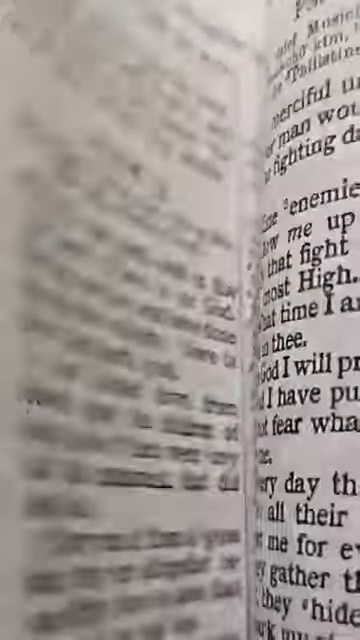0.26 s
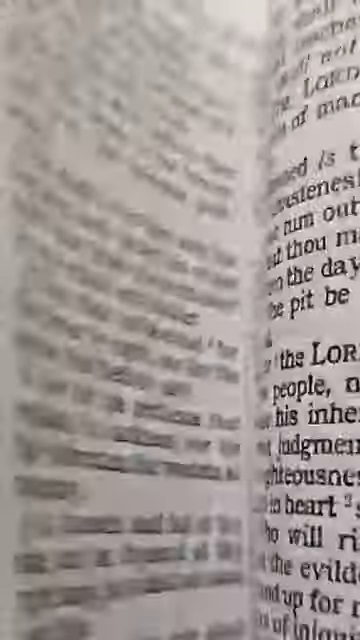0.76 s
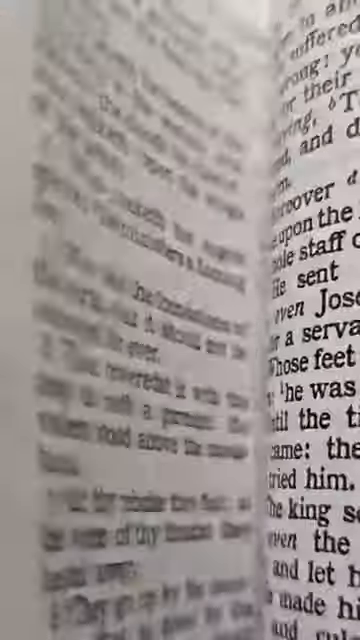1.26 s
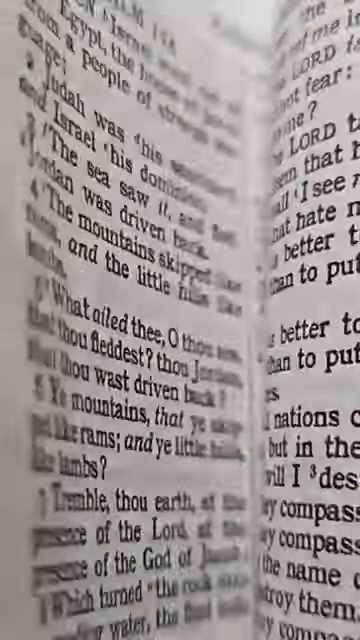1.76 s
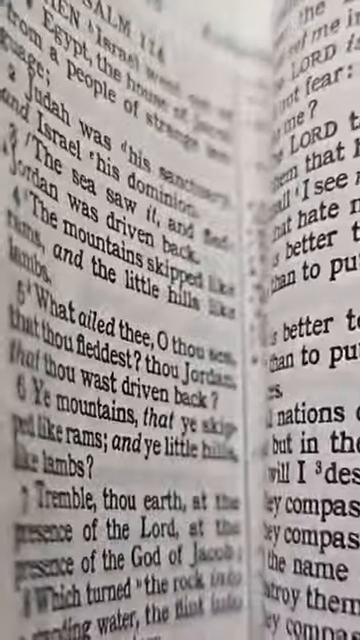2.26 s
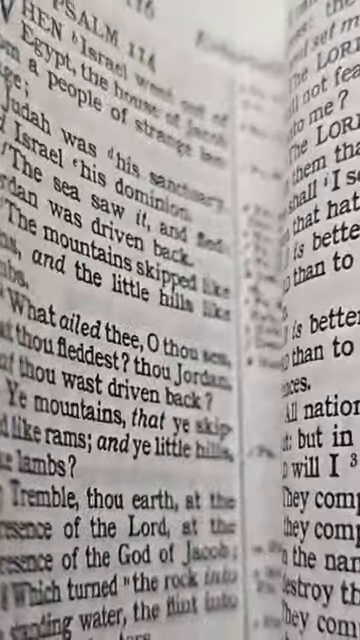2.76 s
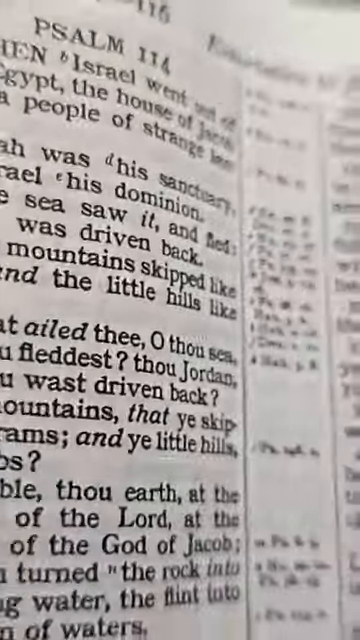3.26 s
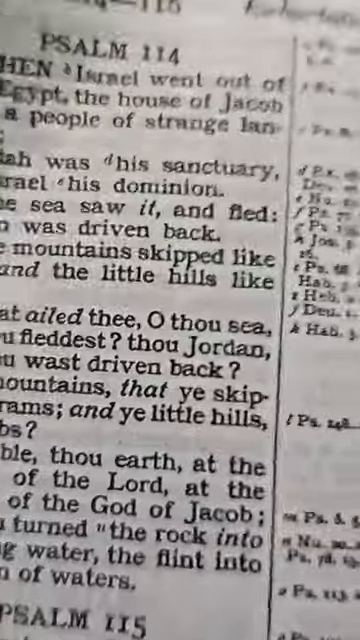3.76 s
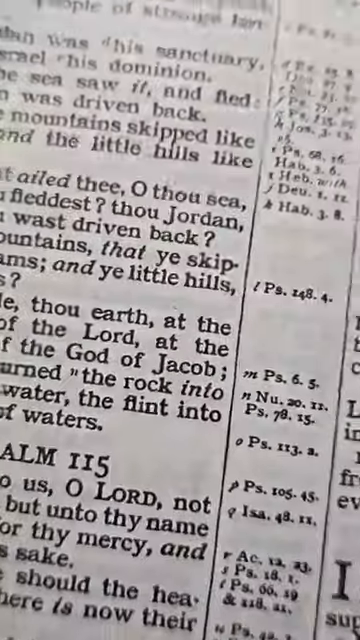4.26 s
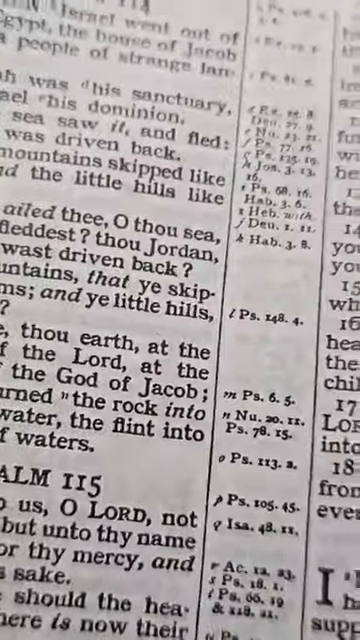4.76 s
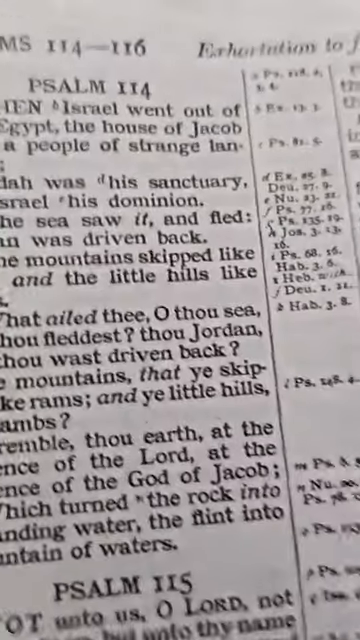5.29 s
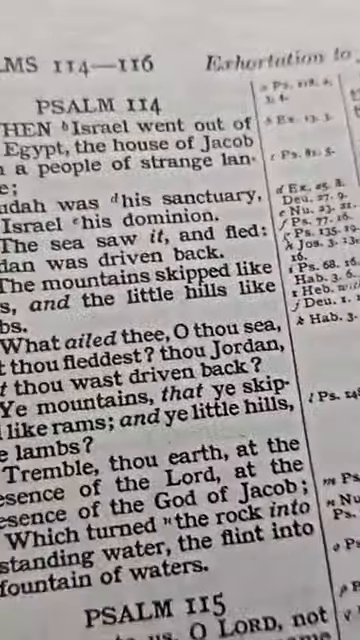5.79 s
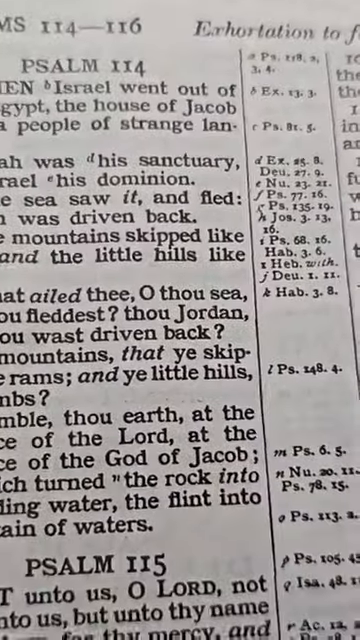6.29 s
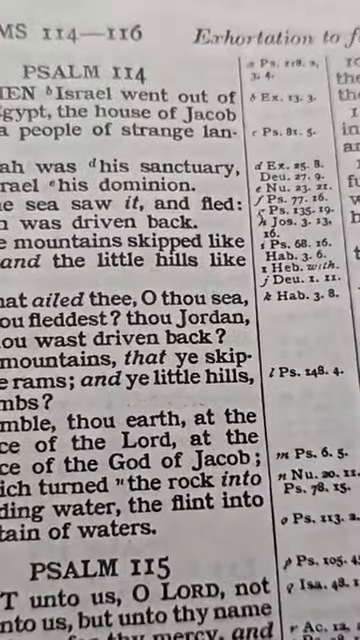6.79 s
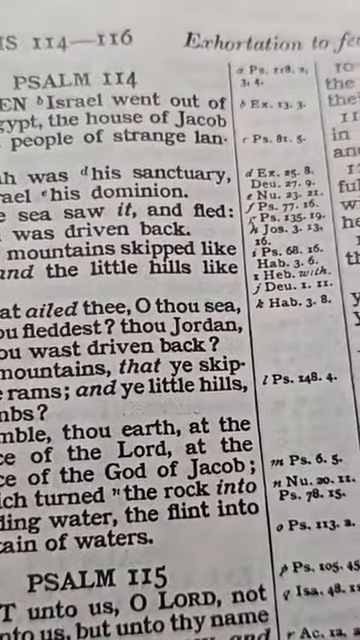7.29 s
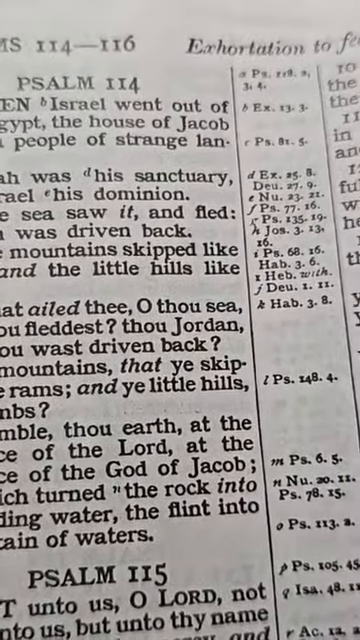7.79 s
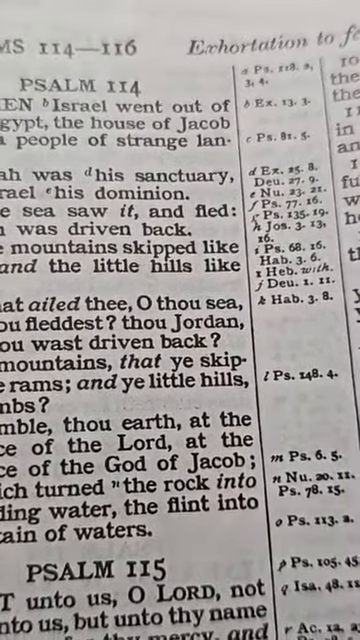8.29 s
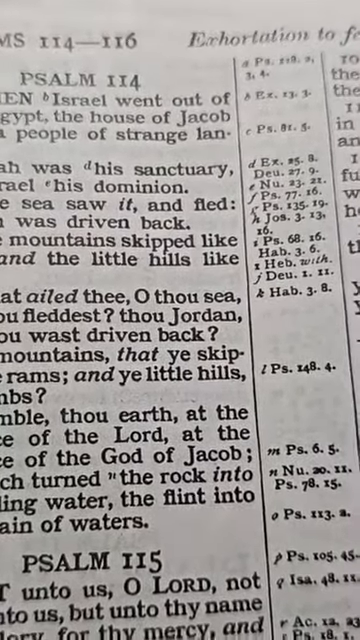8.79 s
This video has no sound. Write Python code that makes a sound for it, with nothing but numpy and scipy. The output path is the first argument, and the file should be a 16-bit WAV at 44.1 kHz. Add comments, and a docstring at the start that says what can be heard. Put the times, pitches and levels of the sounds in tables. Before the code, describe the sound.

Close papery rustles, hollow rubbing and bright crinkling snaps from a thick book's thin pages in a quiet room with faint motor hum.

```python
"""Thin pages of a thick book are leafed through by hand, close to the microphones, in a quiet room.
A few leaves whisper past, a hand sweeps the book flat, then a page is lifted and crackles as it buckles.
Paper is shaped noise: juddering hiss for slides, a hollow rasp for rubbing, short bursts for snaps and pats.
Behind it, two motors of nearly equal speed, built from sine waves, hum and beat slowly against each other.
A low ventilation rumble under faint hiss is steady coloured noise, and the book has a faint echo tail."""
import sys
import numpy as np
from scipy import signal
from scipy.fft import rfft, irfft, next_fast_len
from scipy.io import wavfile
from scipy.ndimage import uniform_filter1d

SR = 44100
rng = np.random.default_rng(int(sys.argv[2]) if len(sys.argv) > 2 else 0)


def log_audio(samples):
    """Write samples as a 16-bit WAV file to the path given in sys.argv[1]."""
    # one column per channel
    frames = np.atleast_2d(samples).T
    # limit to full scale, then quantise
    limited = np.clip(frames, -1, 1)
    pcm = np.round(limited * 32767).astype(np.int16)
    wavfile.write(sys.argv[1], SR, pcm)


N = 399105
TIME = np.arange(N) / SR


def amp(db):
    """Turns decibels into a gain."""
    return 10 ** (np.asarray(db) / 20)


def evened(x):
    """Scales a signal to rms 1."""
    return x / np.sqrt(np.mean(x ** 2) + 1e-20)


def one_ms(x):
    """Gives each channel the energy of one millisecond at rms 1."""
    return x / np.linalg.norm(x, axis=1, keepdims=True) * np.sqrt(SR / 1000)


def read(points, hz):
    """Reads a table of (frequency, value) between its points, on a log-frequency axis."""
    f, value = np.transpose(points)
    return np.interp(np.log(hz + 1), np.log(f + 1), value)


def bell(hz, centre_hz, octaves):
    """A rounded band on a log-frequency axis."""
    return np.exp(-(np.log2((hz + 1) / centre_hz) / octaves) ** 2)


def coloured(x, gain):
    """Filters x by a gain given as a function of frequency."""
    size = next_fast_len(x.shape[1])
    spectrum = rfft(x, size) * gain(np.fft.rfftfreq(size, 1 / SR))
    return irfft(spectrum, size)[:, :x.shape[1]]


def panned(balance_db):
    """Left and right gains of constant power, from left minus right in dB."""
    gains = amp(np.array([[1], [-1]]) * balance_db / 2)
    return gains / np.sqrt(np.mean(gains ** 2, 0))


def add(mix, s, sound):
    """Adds a stereo sound into the mix at time s."""
    part = mix[:, max(round(s * SR), 0):][:, :sound.shape[1]]
    part += sound[:, :part.shape[1]]


def pair(alike, size):
    """Two channels of white noise with the given likeness (1 is identical)."""
    a, b = rng.standard_normal((2, size))
    alike = np.clip(alike, -1, 1)
    return np.array([a, alike * a + np.sqrt(1 - alike ** 2) * b])


def wander(rate_hz):
    """Smooth random movement of rms 1, mostly slower than rate_hz."""
    size = N // 16  # slow movement needs only every 16th sample
    hz = np.fft.rfftfreq(size, 16 / SR)
    slow = irfft(rfft(rng.standard_normal(size)) / (1 + (hz / rate_hz) ** 4), size)
    return evened(np.interp(TIME, np.linspace(0, TIME[-1], len(slow)), slow))


# colour of the room air: (frequency [Hz], relative level [dB])
AIR_COLOUR = [(20, -20), (38, -16), (55, 12), (80, -5), (125, -1), (205, -11), (285, -1.5), (370, -15.5),
              (450, -13.5), (600, -25.5), (1000, -37.5), (2500, -41), (8000, -44.5), (16000, -53.5)]
# likeness of the room air at the two microphones: (frequency [Hz], coherence [0 to 1])
AIR_LIKENESS = [(60, 0.78), (280, 0.96), (640, 0.25), (1400, .15), (15000, .1)]


def room_air(level_db=-56):
    """Low ventilation rumble under a very faint hiss; the bass is mostly common to both microphones."""
    def alike(hz):
        return np.clip(read(AIR_LIKENESS, hz), 0, 1)

    def colour(hz):
        return amp(read(AIR_COLOUR, hz))

    shared = coloured(rng.standard_normal((1, N)), lambda hz: colour(hz) * np.sqrt(alike(hz)))
    apart = coloured(rng.standard_normal((2, N)), lambda hz: colour(hz) * np.sqrt(1 - alike(hz)))
    return amp(level_db) * evened(shared + apart)


# motor speeds, and a moment when their hums swell together
SLOW_HZ, FAST_HZ, IN_STEP_S = 56.335, 58.73, .275
# tones of each motor: (multiple of its speed, level [dB rms], left minus right [dB])
SLOW_TONES = [(1, -54, 0.5), (2, -67.5, 1), (3, -73, -1.7), (5, -62, -1), (6, -71, -2)]
FAST_TONES = [(1, -54.5, 2.5), (3, -64, 4), (6, -79.5, -1), (7, -72.5, -8), (8, -87, -2)]


def motor(shaft_hz, tones, start, flutter_db=.5):
    """A nearly steady shaft tone with overtones whose loudness wavers more the higher they lie."""
    turns = shaft_hz * (TIME - IN_STEP_S) + start + .012 * wander(1)
    hum = np.zeros((2, N))
    for multiple, db, balance_db in tones:
        loudness = amp(db + flutter_db * (multiple - 1) * wander(2))
        tone = np.sqrt(2) * np.cos(2 * np.pi * multiple * turns)  # rms 1
        hum += loudness * tone * panned(balance_db)
    return hum


# creases snapping through: (time [s], energy [dB over one millisecond, before the near echoes],
# fade to 1/e of the main burst [ms], centre frequency [Hz], left minus right [dB])
CREASE_SNAPS = [(0.107, -47.5, 1.2, 4600, 3), (0.139, -50, 1, 2920, -6), (0.5542, -52, 1.6, 4400, -3),
                (1.6388, -53.5, 3.2, 2680, 1), (0.815, -50, 2.3, 4180, 7), (1.586, -61, 1.2, 3520, -7),
                (2.526, -50.5, 1.5, 3040, -2), (2.55, -44.5, .8, 3900, -9), (2.626, -49.5, .9, 4330, -12),
                (3.2043, -53, 0.88, 4500, -5), (3.2574, -41, 2, 4400, -7), (3.462, -41.5, 2.5, 8000, -0.5),
                (3.627, -34, 1.5, 8000, -2.5), (3.7867, -12, 2.8, 5700, 1), (3.937, -36.5, 2.5, 3500, 7.5),
                (4.027, -28.5, 3.5, 3440, -4.5), (4.205, -21.5, 1.3, 4900, -6), (4.381, -49, 2, 4930, 2),
                (4.5763, -43, 2, 3120, -4), (5.0103, -38, 1, 4810, -9.5), (5.0251, -26, 4, 5680, -3),
                (5.066, -19.5, 3.1, 5900, -6), (5.141, -19.5, 2.9, 8500, -3.5),
                (5.2873, -15, 4, 7000, -3.5), (5.294, -20.5, 2, 6700, -2), (5.3244, -19, 1.4, 5400, -2.5),
                (5.371, -17.5, 2.4, 5100, -1.5), (5.395, -13, 6, 5900, -2), (5.41, -23.5, 2.4, 6200, 0),
                (5.5026, -27, 3.6, 4730, -3), (5.533, -23, 4, 5000, -2.5), (5.613, -11.5, 2.2, 5600, -3),
                (5.634, -15, 2.3, 6700, -6), (5.746, -29.5, 1.7, 5260, -0.5),
                (5.761, -34.5, 2.1, 4130, -5.5), (5.8115, -32, 0.94, 6200, -8),
                (5.827, -17.5, 3.6, 6000, -1), (5.949, -32, 2, 4600, -8), (5.97, -36.5, 1.1, 4150, -4),
                (5.995, -23, 1.5, 4500, 0.5), (6.137, -17, 1.3, 3680, -6.5), (6.282, -33.5, .7, 5330, 0),
                (6.364, -33, 2.2, 4300, -3), (6.465, -41, 6.8, 5080, 2), (6.532, -46, 1.6, 5000, -2),
                (6.65, -43, 1.7, 6800, -4), (7.462, -29.5, .8, 5200, -8), (7.604, -25, 3.8, 5540, -8),
                (7.92, -40.5, 1.9, 5700, 1), (8.51, -43, 1.5, 3500, -11), (8.556, -44, 3, 3600, -3.5),
                (8.815, -43.5, 2.5, 5100, -1), (8.9282, -37.5, 3.3, 4400, -2), (9.03, -30, 2.7, 5970, -2)]
# colour of a bending paper sheet: (frequency [Hz], relative level [dB])
PAPER_COLOUR = [(100, -32.5), (400, -17), (850, -13), (1300, -5.5), (2400, -1), (3600, 2.5), (6000, 1.5),
                (8000, -2.5), (10300, -17.5), (12500, -10), (15000, -12.5), (16500, -24.5)]


def snapping(level_db=0, octaves=1.8, skirt_db=-21, skirt_s=0.0035, ragged_db=3, body_db=-13,
             ring=2.2, ring_octaves=0.12, lowest_hz=1200):
    """A crease gives way in an abrupt, ragged cluster of tiny buckles, on a weak skirt of softer noise."""
    out, t = np.zeros((2, N)), np.arange(-512, 1536) / SR
    age = np.where(t < 0, -1.4 * t, t)  # builds faster than it dies
    for s, db, length_ms, centre_hz, balance_db in CREASE_SNAPS:
        burst = np.exp(-(age / (length_ms / 1000)) ** 2)
        skirt = amp(skirt_db) * np.exp(-age / skirt_s)
        buckles = amp(ragged_db * evened(uniform_filter1d(rng.standard_normal(len(t)), size=14)))
        # larger, lower facets also ring briefly at the middle of their band
        ringing = ring * np.interp(centre_hz, [3900, 5000], [1, .15])

        def colour(hz):
            facet = amp(body_db) + bell(hz, centre_hz, octaves) + ringing * bell(hz, centre_hz, ring_octaves)
            taut = np.clip(hz / 4500, .5, 3) ** np.log2(centre_hz / 4200)  # a taut facet is brighter
            small = hz / np.hypot(hz, lowest_hz)  # a small facet radiates little bass
            return amp(read(PAPER_COLOUR, hz)) * facet * taut * small

        snap = coloured(pair(0.085, len(t)) * (burst + skirt) * buckles, colour)
        add(out, s + t[0], one_ms(snap) * amp(level_db + db) * panned(balance_db))
    return out


# each snap also shoves the whole sheet into a dull puff; its level is relative to the snap
SHOVE_DB, SHOVE_DECAY_S, SHOVE_HZ = -25.5, .005, 424
# soft pats of fingers and pages on the book, and low puffs of air pushed by a moving page: # (time [s], energy
# [dB over one millisecond, before the near echoes], decay to 1/e [s], centre frequency [Hz])
SOFT_PATS = [(0.467, -52.5, 0.021, 1340), (0.503, -59, .0055, 1300), (1.511, -65, 0.0051, 1500),
             (1.621, -54, 0.005, 1370), (3.652, -26, 0.067, 477), (3.815, -25.5, .008, 600),
             (4.193, -23, 0.0083, 1370), (4.251, -27, 0.0059, 354), (4.576, -42, 0.0022, 1420),
             (4.849, -47, 0.0017, 1530), (5.261, -33.5, 0.0024, 350), (5.292, -34.5, 0.014, 270),
             (5.369, -34, 0.0077, 500), (5.395, -30, .0025, 1515), (5.398, -32.5, 0.0035, 248.6),
             (5.994, -36, 0.0034, 1600)]


def patting(level_db=0, octaves=0.45, spread_db=-13, balance_db=-3):
    """Fingers or pages land, or a snap shoves the sheet: dull puffs, a main band on a broad, weaker base."""
    out, t = np.zeros((2, N)), np.arange(-256, 3840) / SR
    shoves = [(s, db + SHOVE_DB, SHOVE_DECAY_S, SHOVE_HZ) for s, db, *_ in CREASE_SNAPS]
    for s, db, decay_s, centre_hz in list(SOFT_PATS) + shoves:
        puff = pair(.6, len(t)) * (t >= 0) * np.exp(-abs(t) / decay_s)
        puff = coloured(puff, lambda hz: bell(hz, centre_hz, octaves) + amp(spread_db) * bell(hz, centre_hz, 1.5))
        add(out, s + t[0], one_ms(puff) * amp(level_db + db) * panned(balance_db))
    return out


def stroke(t, start, length, attack_s, arch_db, release_s, settle_db, settle_s=.06):
    """Gain of one stroke: it builds, is strongest in the middle, stops, and leaves the paper settling."""
    early, late = np.maximum(start - t, 0), np.maximum(t - start - length, 0)
    off_centre = 2 * np.clip((t - start) / length, 0, 1) - 1
    release = np.maximum(np.exp(-late / release_s), amp(settle_db) * np.exp(-late / settle_s))
    return np.exp(-early / attack_s) * amp(-arch_db * off_centre ** 2) * release


# stroke shapes: attack [s], arch [dB], release [s], settling [dB]
# a loose leaf goes on settling; the hand stops short
LEAF_SHAPE = (.015, 0.5, 0.011, -7)
HAND_SHAPE = (.028, 2, 0.01, -33.5)
# a sliding leaf also stirs the block: rasp at the usual slide level, and dB of rasp per dB of slide
LEAF_RASP_DB, USUAL_SLIDE_DB, RASP_GROWTH = -60, -45, 0.63
# a leaf slides over its neighbour: (start [s], length [s], relative hiss level [dB],
# crispness as treble tilt [dB per 2.7-fold step in frequency], left minus right [dB])
LEAF_SLIDES = [(0.12, .05, -67, -7.5, 4), (0.28, 0.053, -77.5, -1.5, 0), (0.467, 0.038, -63.5, -4.5, 1),
               (0.586, 0.035, -58, -5.5, 1), (0.811, .03, -67, -4, 2), (0.93, .22, -82, -3.5, 1),
               (1.519, 0.16, -75.5, -4.5, 0), (1.78, 0.057, -75, -6, -2), (1.98, .14, -70, -3, -6.5),
               (2.21, 0.04, -81, -3, -3), (2.548, .09, -66.5, -7.5, -1.5), (2.735, 0.047, -79, -1.5, -5),
               (3.17, 0.044, -75.5, -1, -5), (4.42, .08, -54.5, 0, -0.5), (4.797, .03, -50.5, 5.5, -1.5),
               (4.905, 0.13, -58.5, -1, 0), (5.015, .075, -42.5, 3.5, -3.5), (5.16, .11, -42, 4, -2.5),
               (5.28, .05, -28, 5.5, -2.5), (5.356, .04, -30.5, 2, -3.5), (5.479, .18, -40.5, -0.14, -2),
               (5.72, .11, -58, -4, -1), (5.94, .05, -55.5, 0, 0), (6.04, .035, -48, 0, -1.5),
               (6.139, 0.083, -56, 3, 2), (6.235, 0.148, -54.5, 2, -1.5), (6.474, .02, -60.5, -1, -3),
               (6.65, .11, -74.5, -0.5, -4), (7.033, .01, -68.5, 0, -1), (7.282, .04, -71.5, 1.5, -1),
               (7.375, .05, -52.5, 0, -2), (7.6, 0.057, -70.5, -3.5, 8), (7.912, 0.042, -58.5, -1, 2),
               (8.434, 0.088, -63, 5, -2), (8.544, .03, -61.5, -6, 0), (8.854, 0.0248, -61.5, 2, 0),
               (8.919, 0.016, -59, -2.5, 0), (9.037, .03, -49, -1, 1)]
# the hand sweeps over the page, and last a soft slide that also stirs the block: (start [s], length [s], #
# relative hiss level [dB], crispness as above, left minus right [dB], relative rasp level of the block [dB])
HAND_SWEEPS = [(3.308, 0.044, -42, -3.5, -1, -45.5), (3.398, 0.094, -50.5, -5.5, -0.5, -44.5),
               (3.555, .15, -45, -4.5, -5, -42), (3.72, 0.13, -34.5, -2.5, -7, -43.5),
               (3.877, .11, -56, -2, -4.5, -53), (4.053, .13, -38.5, -3, -6.5, -48.5),
               (4.185, .085, -32, 2.5, -2, -40), (4.541, 0.1206, -69, -1.5, 2, -65.5)]


def motion():
    """All strokes together: hiss and rasp levels, with crispness and side weighted towards the strongest hiss."""
    t = np.arange(0, N / SR, .002)
    leaf = [stroke(t, *row[:2], *LEAF_SHAPE) for row in LEAF_SLIDES]
    hand = [stroke(t, *row[:2], *HAND_SHAPE) for row in HAND_SWEEPS]
    leaves = [(*row, LEAF_RASP_DB + RASP_GROWTH * (row[2] - USUAL_SLIDE_DB)) for row in LEAF_SLIDES]
    _, _, hiss_db, tilt_db, balance_db, rasp_db = np.vstack([leaves, HAND_SWEEPS]).T
    power = np.vstack([leaf, hand]).T ** 2 + 1e-12
    hiss, rasp = power * amp(hiss_db) ** 2, power * amp(rasp_db) ** 2  # strokes overlap in power
    share = hiss / hiss.sum(1, keepdims=True)
    controls = 10 * np.log10(hiss.sum(1)), 10 * np.log10(rasp.sum(1)), share @ tilt_db, share @ balance_db
    return [np.interp(TIME, t, control) for control in controls]


def flexing(x, colour, tilt_db, patchy_db, ripple_db):
    """A bending sheet radiates x: patches flicker, narrow resonances drift, tautness tilts the treble."""
    hz, t, z = signal.stft(x, SR, nperseg=512)
    patches = uniform_filter1d(rng.standard_normal(z.shape), size=3, axis=2)
    patches = evened(uniform_filter1d(patches, size=9, axis=1))
    ripples = uniform_filter1d(rng.standard_normal(z.shape[1:]), size=16, axis=1)
    ripples = evened(uniform_filter1d(ripples, size=2, axis=0))
    tilt = np.log(np.clip(hz, 1200, 13000) / 4500)[:, None] * np.interp(t, TIME, tilt_db)
    gain = amp(read(colour, hz)[:, None] + tilt + patchy_db * patches + ripple_db * ripples)
    gain /= np.sqrt(np.mean(gain ** 2, axis=(0, 1)))  # flexing leaves the overall level to the strokes
    return evened(signal.istft(z * gain, SR, nperseg=512)[1][:, :N])


def crinkles(hiss_db, per_s=24, strength=6.7, decay_s=.001, brisk_share=.35):
    """Envelope of small wrinkles popping at random; they stand out most when the leaf moves gently."""
    pops = (rng.random(N) < per_s / SR) * rng.uniform(.3, 1, N)
    gentle = np.interp(hiss_db, [-45, -30], [1, brisk_share])
    return strength * gentle * signal.lfilter([1], [1, -np.exp(-1 / (decay_s * SR))], pops)


def sliding(hiss_db, tilt_db, balance_db, level_db=0, catches_per_s=900, catch_size=2.4,
            spread_db=6.0, judder_db=1.6):
    """Fibres catch and let go: a fine hiss that judders, with separate tiny ticks and crinkles in it."""
    hiss = pair(.05, N) * amp(judder_db * wander(60)) * (2.5 + crinkles(hiss_db))
    catch_gain = amp(spread_db * np.minimum(rng.exponential(1, N), 3))
    catches = (rng.random(N) < catches_per_s / SR) * catch_gain
    drive = hiss + catch_size * catches * pair(0.28, N)
    sheet = flexing(drive, PAPER_COLOUR, tilt_db, patchy_db=1.7, ripple_db=3.0)
    return sheet * amp(level_db + hiss_db) * panned(balance_db)


# colour of the thick block of pages: (frequency [Hz], relative level [dB])
BLOCK_COLOUR = [(60, -24.5), (180, -2), (300, -2), (540, 5.5), (850, -5.5), (1300, -12.5), (2200, -17.5),
                (5000, -46), (16000, -51.5)]


def rubbing(rasp_db, level_db=1, judder_db=3.0, balance_db=-2):
    """Skin drags unevenly over the page and the thick block beneath answers with a hollow rasp."""
    drive = pair(0.64, N) * amp(judder_db * wander(72))
    block = flexing(drive, BLOCK_COLOUR, np.zeros(N), patchy_db=2, ripple_db=4.5)
    return block * amp(level_db + rasp_db) * panned(balance_db)


# echoes off the open pages and other near surfaces: (delay [ms], level [dB], channel [0 left, 1 right])
SURFACE_ECHOES = [(1.35, -24, 0), (3.2, -6, 0), (1.75, -24.5, 1), (3.6, -14, 1)]
# colour of each microphone port for close sound: (frequency [Hz], left level [dB], right level [dB])
PORT_COLOURS = [(300, 3, 2), (557, -6.5, -0.5), (1000, 2, 1), (2627, 0, -3.5), (3900, -8, 1),
                (5900, -3.5, -0.5), (6700, -3.5, -1), (8500, 2, -4), (9900, 8.5, -9), (11200, 1.5, 1.5),
                (13000, 1, 1), (15500, -1, 1.5)]


def close_up(x):
    """Near surfaces comb the sound, then each microphone port colours it."""
    heard = x.copy()
    for delay_ms, db, channel in SURFACE_ECHOES:
        one_side = (np.arange(2) == channel)[:, None]
        add(heard, delay_ms / 1000, amp(db) * x * one_side)
    ports = np.array(PORT_COLOURS)
    return coloured(heard, lambda hz: amp([read(ports[:, [0, side]], hz) for side in (1, 2)]))


# reverberation of the room: (frequency [Hz], time to die by 60 dB [s])
ECHO_DECAY = [(200, 1), (1500, 0.27), (5000, 0.23), (15000, 0.35)]


def room(x, wet_db=-20, onset_s=0.024):
    """The room answers with a faint diffuse tail, each band dying at its own speed."""
    hz, t, z = signal.stft(rng.standard_normal((2, SR // 2)), SR, nperseg=256)
    decay = amp(-60 * t / read(ECHO_DECAY, hz)[:, None])
    build_up = 1 - np.exp(-t / onset_s)
    tail = signal.istft(z * decay * build_up, SR, nperseg=256)[1]
    return amp(wet_db) * signal.fftconvolve(x, tail / np.linalg.norm(tail[0]), axes=1)[:, :N]


def scene():
    """The book close by, the room and its hum behind."""
    hiss_db, rasp_db, tilt_db, balance_db = motion()
    paper = sliding(hiss_db, tilt_db, balance_db) + snapping()
    book = close_up(paper + rubbing(rasp_db) + patting())
    start = rng.random()  # both motors share this point of the turn when in step
    hum = motor(SLOW_HZ, SLOW_TONES, start) + motor(FAST_HZ, FAST_TONES, start)
    return book + room(book) + hum + room_air()


def record(dry, edge_hz=16100):
    """A steep low-pass filter removes the highest treble."""
    low_pass = signal.firwin(255, edge_hz, window=("kaiser", 9), fs=SR)
    return signal.oaconvolve(dry, low_pass[None], "same")


dry = scene()
out = record(dry)
log_audio(out)
```